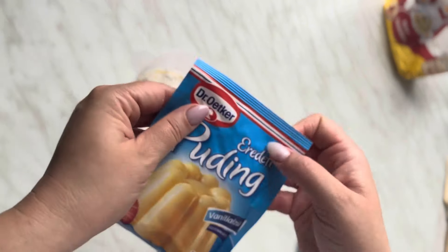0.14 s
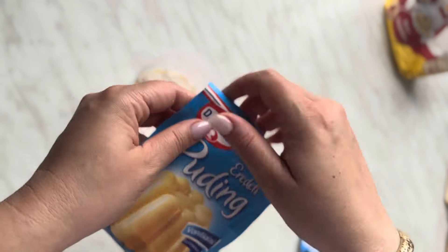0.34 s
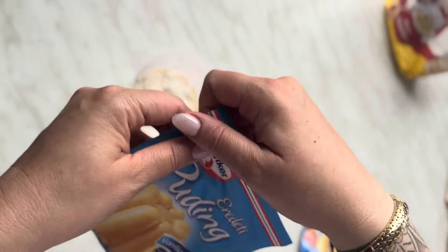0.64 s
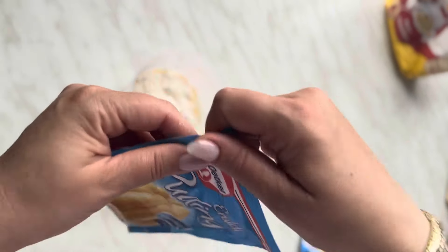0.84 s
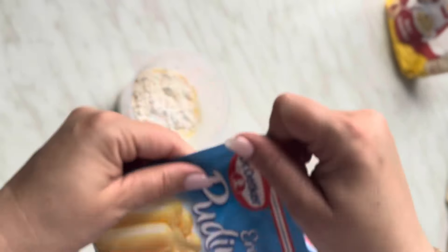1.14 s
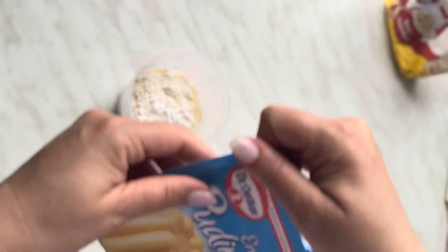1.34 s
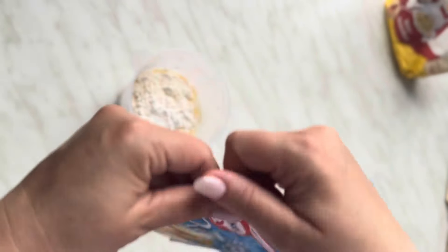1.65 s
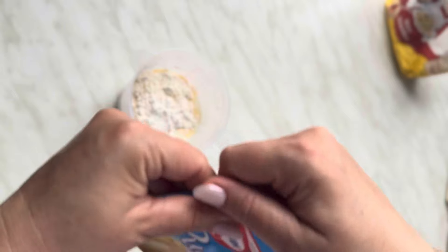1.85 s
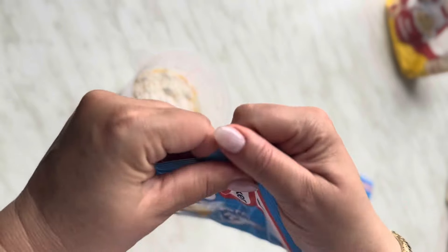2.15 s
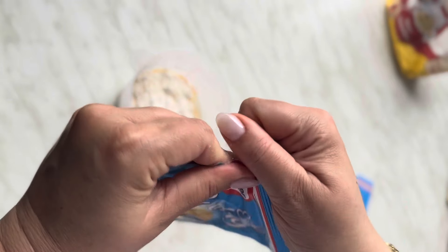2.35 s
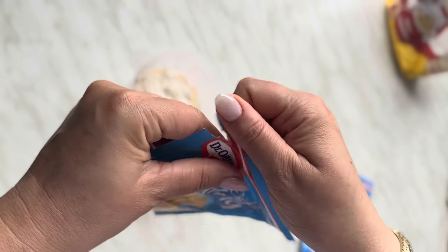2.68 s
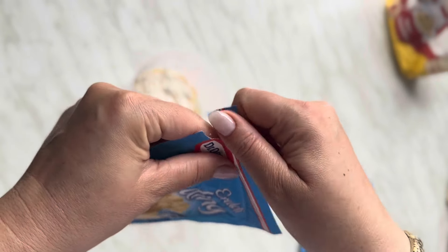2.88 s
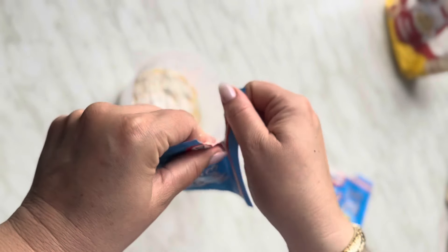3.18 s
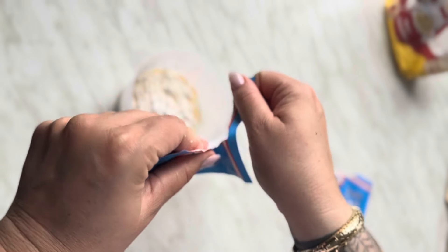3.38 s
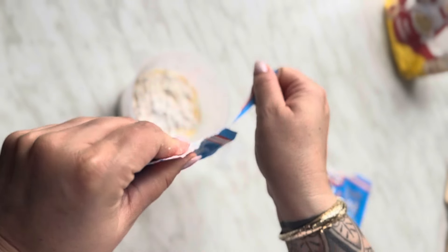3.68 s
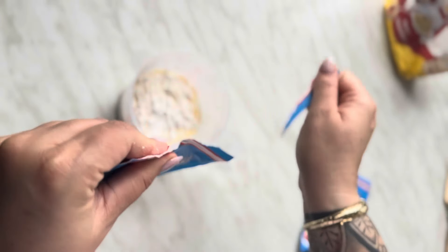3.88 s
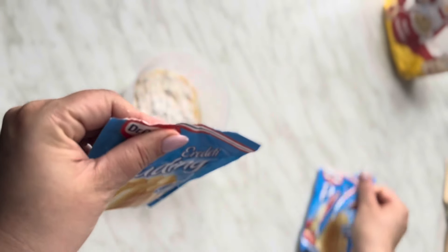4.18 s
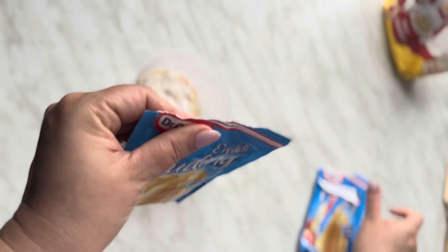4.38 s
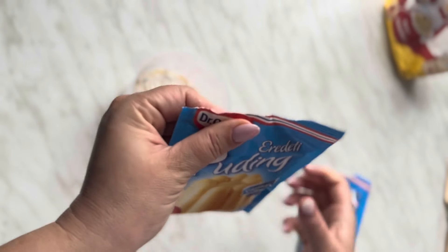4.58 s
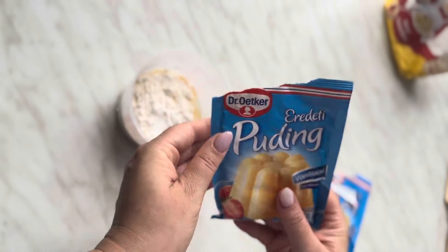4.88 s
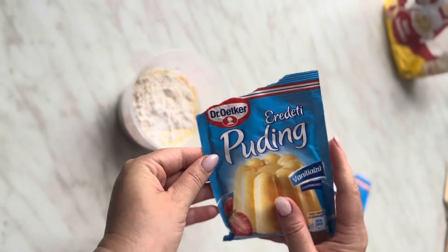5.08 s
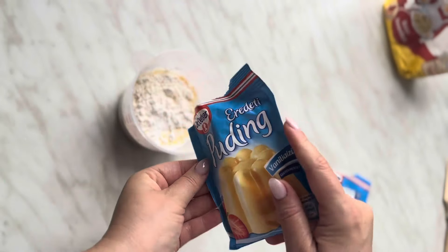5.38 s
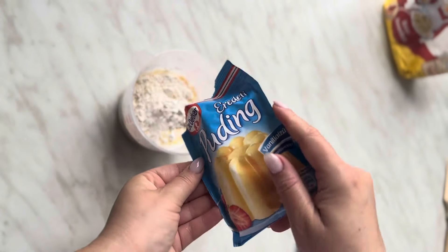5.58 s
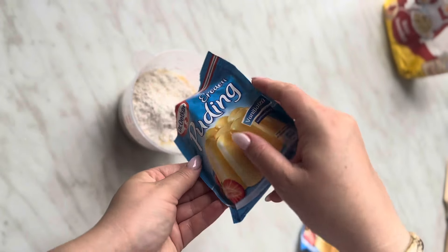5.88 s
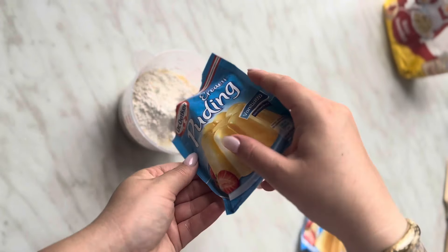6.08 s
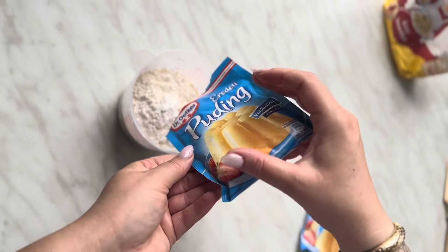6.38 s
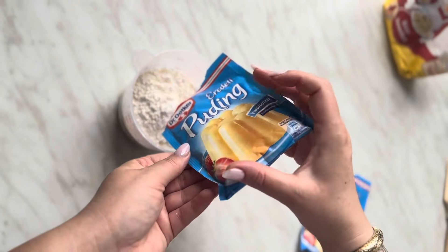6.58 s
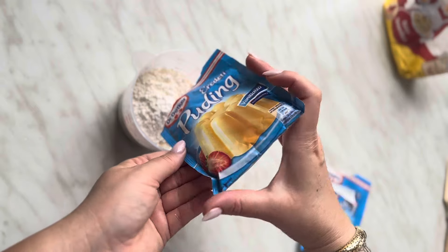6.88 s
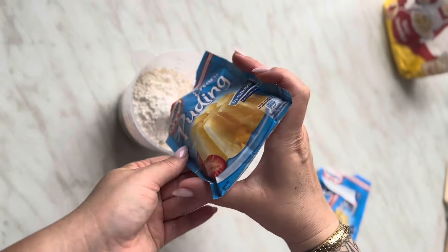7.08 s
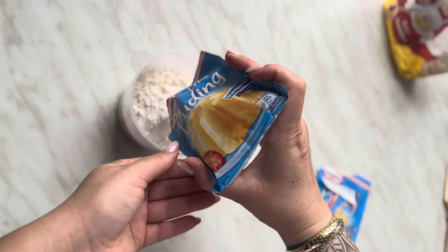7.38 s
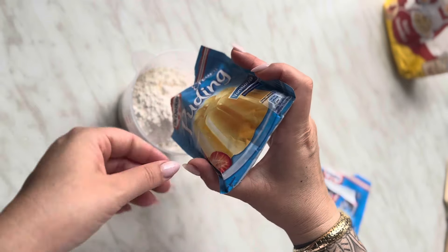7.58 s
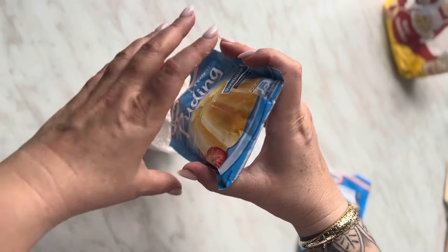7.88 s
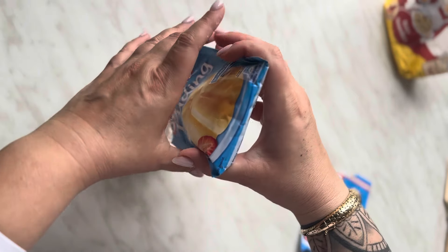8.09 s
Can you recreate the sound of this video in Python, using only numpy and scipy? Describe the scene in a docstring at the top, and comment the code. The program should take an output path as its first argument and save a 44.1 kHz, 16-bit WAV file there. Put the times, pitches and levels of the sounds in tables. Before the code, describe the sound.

Two hands work a stiff, powder-filled paper sachet close to the microphone in a small kitchen. Dense crisp snaps and crinkles come first, with dull pops and a tiny zip, then a gritty tear in uneven spurts. A quiet stretch holds faint ticking creaks before a burst of loud pops as the packet is squeezed, and sparse soft crackles follow over low hum.

```python
"""Tearing open a paper sachet

Two hands grip a coated, powder-filled paper sachet over a kitchen worktop, tear off its top strip and squeeze it open.
The stiff wall buckles in sharp snaps, each a filtered impulse with a noisy flutter, over a fine crinkle of random
impulses; the tear is a dense run of breaking fibres, the seam a short tone burst, the thuds decaying sines.
A creak of regular ticks is heard at times. A small kitchen with a mains hum in still air answers with
echoes of shaped noise, and two closely spaced microphone ports listen from just above."""
import sys
import numpy as np
from scipy import signal
from scipy.fft import rfft, irfft, next_fast_len
from scipy.io import wavfile
from scipy.ndimage import map_coordinates

SR = 44100
rng = np.random.default_rng(int(sys.argv[2]) if len(sys.argv) > 2 else 0)


def digitize_waveform(pressure):
    """Quantize a signal to 16-bit integers and store it at the path in sys.argv[1].

    Rows of a 2-D input are taken as channels; values are limited to [-1, 1].
    """
    field = np.atleast_2d(pressure).T
    bounded = np.clip(field, -1, 1)
    quanta = np.round(bounded * 32767).astype(np.int16)
    wavfile.write(sys.argv[1], SR, quanta)


N = 363384
T = np.arange(N) / SR  # s

# snaps of a crease: start_s, level_db, pitch_hz of the buckling patch, crack_db of the coating re the snap
CREASE_SNAPS = [(0.004, -4.5, 1290, -14.5), (0.091, -4, 1790, -28), (0.14, -10.5, 2440, -2.5),
                (0.3293, -4, 1560, -14.5), (0.352, -8, 1320, -5.5), (0.376, -9, 2660, -10),
                (0.414, -9.5, 1550, -25), (0.489, -10, 1270, -2), (0.505, -15.5, 1900, 1),
                (0.5163, 0.5, 1480, -24), (0.5201, -4, 850, 3.5), (0.541, -4.5, 1400, -6),
                (0.5626, -6.5, 1880, -3), (0.6498, -11.5, 1190, -11), (0.727, -11.5, 2130, -19),
                (0.769, -7.5, 2460, -0.5), (0.9212, -4.5, 1190, -8), (0.9427, -2.5, 2370, -23),
                (0.9493, 2, 1260, -9.5), (0.9556, 0, 2030, -11), (0.9646, -1, 900, -9),
                (1.011, -9, 1400, -8), (1.0216, 2, 486, -6.5), (1.0376, 3, 1980, -7.5),
                (1.051, -10, 3500, -11), (1.07, -22, 1210, 13), (1.0972, -3.5, 1590, -24),
                (1.105, -5.5, 377, -28), (1.128, -6.5, 1120, -9), (1.15, -5.5, 1980, -5),
                (1.1554, 1, 920, -1.5), (1.1656, 5.5, 3800, -8.5), (1.205, -3, 1060, -23),
                (1.248, -6, 377, -35), (1.2782, -12.5, 1250, -30), (1.326, -9, 1010, -5.5),
                (1.3645, -24, 2010, 7), (1.429, -3, 3240, -5), (1.4813, -15, 1000, 2.5),
                (1.6229, -20.5, 1270, 4.5), (1.855, -28.5, 2460, 12), (1.8643, -7, 1920, -2.5),
                (1.8797, -11.5, 3110.0, -10), (1.918, -10, 1400, 3.5), (1.999, -10, 3050, 2),
                (2.034, -18, 4300, -20), (2.0595, 4.5, 1800, -12), (2.1557, -9, 1970, -3.5),
                (2.205, -3, 920, -11), (2.2145, 1, 660, -20), (2.3061, 2, 2230, 2), (2.3075, 10, 408, -31),
                (2.3717, -3.5, 1910, -8), (2.513, -27, 1300, 9.5), (2.5557, -10.5, 990, -14),
                (2.625, -24.5, 2000, 5.5), (2.683, -13, 1500, -10), (2.767, -11, 2000, -9),
                (2.8108, -13, 1390, -10), (2.8947, -9, 1850, -15), (2.907, -14.5, 1780.0, 11),
                (2.99, -11, 1100, 3), (3.142, -0.5, 1620, -3.5), (3.152, -5, 1190, 2),
                (3.403, -10, 2000, -6), (3.5488, -1.5, 2080, -11), (3.5856, -2.5, 2340, -3.5),
                (3.932, -17.5, 2200, -24), (3.958, -14.5, 1390, -19), (4.0171, -15.5, 2070, -5.5),
                (4.0307, -17.5, 2200, -1.5), (4.106, -17, 1600, -20), (4.122, -20, 2300, -4.5),
                (4.2528, -14, 2380, -4), (4.51, -15.5, 3250, -6), (4.522, -19, 3120, -9),
                (4.601, -25, 2940, -25), (4.7556, -14.5, 980, -3), (4.769, -11.5, 2400, -11),
                (4.934, -10, 1560, -33), (5.0414, -9, 1450, -37), (5.064, -13, 2720, -33),
                (5.237, -18, 2200, -36), (5.277, -6.5, 855, -41), (5.3064, 6, 2710, -17),
                (5.316, 2, 1870, -12), (5.3469, 3, 1540, -28), (5.352, 3.5, 1700, -13.5),
                (5.464, -18, 1670, -27), (5.599, 0.5, 1740, -14), (5.61, -23, 2130.0, 12),
                (5.706, -2.5, 1590, -13), (5.768, -1.5, 1850, -31), (5.8193, -1, 1090, -21.5),
                (6.0273, -16, 1250, -18), (6.1836, -6.5, 2070, -40), (6.2229, -9, 2240, -45),
                (6.33, -17, 1480, -14), (6.4548, -1, 1720, -14), (6.477, -8, 850, -33),
                (6.7597, -6, 1400, -25), (6.818, -11.5, 2400, -18), (6.8366, -22, 2200, -21),
                (6.8951, -13.5, 2240, -17), (6.926, -11.5, 1590, -9.5), (6.9687, -19.5, 1480, -27),
                (7.1401, -8.5, 980, -33), (7.242, -11.5, 1310, -36), (7.3353, -7, 1200, -49),
                (7.4451, -6.5, 1500, -15), (7.5304, -17, 1220, -31), (7.7034, -20, 1340, -32),
                (8.066, -13, 1430, -42), (8.1095, -7, 1110, -45), (8.158, 1, 1460, -44),
                (8.1588, 2, 870, -28.5), (8.173, -16, 1580, -35)]
# slackness of the wall, which pushes air and flutters with each snap: time_s, push_db re the snap,
# flutter (amplitude ratio re the first flip)
SLACKNESS = [(.3, 0.5, 0.63), (1.0, -3, 0.66), (1.5, 2, 0.56), (2.3, -12, 0.69), (3.6, -8.5, 0.88),
             (4.8, 4, 0.47), (5.33, -15.5, 0.31), (5.8, -6, 0.83), (6.6, -3, 0.7), (8.201, -2, 0.78)]


def amp(db):
    """Level: a ratio in decibels becomes an amplitude gain."""
    return 10 ** (np.asarray(db) / 20)


def evened(x):
    """Mean power: scales a signal to rms 1."""
    return x / np.sqrt(np.mean(x ** 2) + 1e-20)


def read(points, hz):
    """Logarithmic pitch scale: interpolates a table along log frequency."""
    f, value = np.transpose(points)
    return np.interp(np.log(hz + 1), np.log(f + 1), value)


def add(mix, s, sound):
    """Superposition: adds a sound into the mix, in place, from a time in seconds."""
    part = mix[max(round(s * SR), 0):][:len(sound)]
    part += sound[:len(part)]


def click(gain):
    """Minimum phase: the causal impulse response that has this magnitude spectrum."""
    log_gain = np.log(np.maximum(np.r_[gain, gain[-2:0:-1]], 1e-5))
    return np.fft.ifft(np.exp(np.conj(signal.hilbert(log_gain)))).real


def coloured(x, spectrum, size=2048):
    """Linear filtering: convolution with a causal response imposes a spectral colour."""
    hz = np.fft.rfftfreq(size, 1 / SR)
    return signal.oaconvolve(x, click(amp(read(spectrum, hz))))[:N]


def bell(hz, centre_hz, q):
    """Resonance curve: magnitude peaks at the centre and narrows with q."""
    return 1 / (1 + (q * (hz / centre_hz - centre_hz / (hz + 1))) ** 2)


def resonate(x, hz, width_hz):
    """Time-varying resonance: a one-pole filter, shifted to a moving frequency, with gain 1 at its peak."""
    turn = np.exp(2j * np.pi * np.cumsum(hz) / SR)
    r = np.exp(-np.pi * width_hz / SR)
    return 2 * (turn * signal.lfilter([1 - r], [1, -r], x / turn + 1e-18)).real


def grains(per_s, spread_db, clump_db, clump_s):
    """Random impulse process: tiny fractures of uneven size whose strength swells in clumps; rms 1."""
    size = amp(spread_db * np.minimum(rng.exponential(1, N), 4)) * rng.choice([-1, 1], N)
    clumps = np.interp(T / clump_s, np.arange(N), np.clip(rng.standard_normal(N), -2, 2))
    struck = rng.random(N) < per_s / SR
    return evened(size * amp(clump_db * clumps) * struck)


def crackles(per_s, spread_db, count=14, size=512):
    """Impulsive excitation of resonators: tiny creases of many pitches, broadband in sum; rms 1."""
    hz, out = np.fft.rfftfreq(size, 1 / SR), np.zeros(N)
    for pitch_hz in np.geomspace(200, 9000, count):
        strength = amp(spread_db * np.minimum(rng.exponential(1, N), 3)) * rng.choice([-1, 1], N)
        hits = strength * (rng.random(N) < per_s / count / SR)
        out += signal.oaconvolve(hits, click(bell(hz, pitch_hz, 2.03)))[:N]
    return evened(out)


def patchy(x, depth_db, patch_s=0.016, patch_hz=450, size=512):
    """Modal variation: as the sheet changes shape its resonances swell and fade in time-frequency patches."""
    hz, t, z = signal.stft(x, SR, nperseg=size)
    where = np.meshgrid(hz / patch_hz, t / patch_s, indexing="ij")
    field = map_coordinates(rng.standard_normal(z.shape), where, order=1)
    return signal.istft(z * amp(depth_db * field), SR, nperseg=size)[1][:N]


def apart(pair, alike_hz, least_alike=0):
    """Spatial coherence: mixes two unrelated signals into a diffuse field, alike in the bass, less so above."""
    hz = np.fft.rfftfreq(pair.shape[1], 1 / SR)
    same = np.clip(1 / (1 + (hz / alike_hz) ** 2), least_alike, 1)
    mid, side = rfft(pair) * np.sqrt([1 + same, 1 - same]) / np.sqrt(2)
    return irfft([mid + side, mid - side], pair.shape[1])


def background(waver=0.33, air_db=-58.5):
    """Narrowband modulation and filtered noise: a wavering mains hum in still air."""
    # still air of the kitchen: frequency_hz, density_db (relative, per Hz)
    air_colour = [(20, -3.5), (45, -11), (90, 5.5), (160, 1), (220, -10), (300, -3), (700, -15),
                  (2200, -25.5), (6000, -28.5), (8500, -60), (11000, -79.5), (16000, -35)]
    # mains hum: frequency_hz, level_db (rms)
    hum_tones = [(48.8, -55), (80, -61), (100, -65), (148.5, -66.5)]
    air = apart(np.array([coloured(n, air_colour) for n in rng.standard_normal((2, N))]), alike_hz=670)
    hum = np.zeros(N)
    for hz, db in hum_tones:
        # nine random complex points a second vary both amplitude and phase
        drift = np.interp(T * 9, np.arange(200), rng.standard_normal(200) + 1j * rng.standard_normal(200))
        carrier = np.exp(2j * np.pi * (hz * T + rng.random()))
        hum += amp(db) * evened(((1 + waver * drift) * carrier).real)
    return hum + amp(air_db) * evened(air)


def echoes(near_db=-7, near_s=0.0021, tail_db=-10, dull_hz=12000, size=256):
    """Reflection and reverberation: early echoes off hands and worktop, then a tail, for one hand position."""
    # the kitchen's decay: frequency_hz, t60_s
    decay = [(200, 0.23), (700, 0.2), (2000, 0.15), (5000, 0.25), (9000, 0.08), (15000, 0.093)]
    t = np.arange(SR // 3) / SR
    near = rng.standard_normal((2, len(t))) * (rng.random((2, len(t))) < 2500 / SR)
    near = near * np.exp(-t / near_s) * (t > .0015)
    hz, at, z = signal.stft(rng.standard_normal((2, len(t))), SR, nperseg=size)
    z = z * np.exp(-np.log(1000) * at / read(decay, hz)[:, None])
    tail = signal.istft(z, SR, nperseg=size)[1][:, :len(t)]
    tail *= np.clip(t / 0.0035 - 1, 0, 1)  # the tail fades in from 3.5 to 7 ms
    both = amp(near_db) * evened(near) + amp(tail_db) * evened(tail)
    both = apart(both, alike_hz=397, least_alike=0.42) / np.sqrt(len(t))
    return signal.sosfilt(signal.butter(2, dull_hz, fs=SR, output="sos"), both)  # skin and walls soak up the top


def kitchen(x, shift_s=.13, count=5):
    """Room response: direct sound at both ports plus echoes that crossfade in a cycle as the hands move."""
    out = np.array([x, x])
    for k in range(count):
        distance = abs((T / shift_s - k) % count - count / 2)
        share = x * np.sqrt(np.maximum(1 - distance, 0))
        out += signal.oaconvolve(share[None], echoes(), axes=1)[:, :N]
    return out


def bumps():
    """Damped oscillation: the powder-filled sachet thuds as it jerks or a finger lands."""
    # thuds: start_s, level_db, pitch_hz, decay_s (time constant)
    thuds = [(0.951, -46, 74, 0.051), (1.021, -50, 101, .059), (2.311, -36, 215, .005),
             (3.645, -44, 262, 0.015), (3.677, -41.5, 174, 0.017), (7.336, -44.5, 151.5, 0.077)]
    out, t = np.zeros(N), np.arange(SR // 5) / SR
    for s, db, hz, decay_s in thuds:
        add(out, s, amp(db) * np.sin(2 * np.pi * hz * t) * np.exp(-t / decay_s))
    return out


def creak(level_db=1.5):
    """Stick-slip friction: as the held wall relaxes under the thumb it slips in short, regular runs of ticks."""
    # runs of slips: start_s, length_s, rate_per_s, level_db (before level_db of the creak)
    runs = [(4.21, .056, 205, -20), (4.317, .014, 80, -16), (4.336, .016, 145, -18), (4.361, .022, 48, -16),
            (4.4075, .036, 59, -13), (4.455, .03, 105, -16)]
    # colour of one slip: frequency_hz, gain_db
    slip_colour = [(600, -18.5), (1500, -10), (1850, -15.5), (2200, -4.5), (3000, -17), (4000, -10),
                   (7000, -20), (11000, -32)]
    slips = np.zeros(N)
    for start, length, per_s, db in runs:
        for s in start + np.arange(0, length, 1 / per_s):
            add(slips, s, amp(db + level_db + rng.standard_normal(1)))
    return coloured(slips, slip_colour)


def seam():
    """Periodic release: the ribs of the sealed edge part in one very fast zip, a tone burst under an arch."""
    # the zip: start_s, peak_db, pitch_hz, length_s
    s, db, hz, length = (2.3062, -5.2, 11250, .001)
    out, t = np.zeros(N), np.arange(0, length, 1 / SR)
    arch = np.sqrt(np.sin(np.pi * t / length))
    add(out, s, amp(db) * arch * np.sin(2 * np.pi * hz * t))
    return out


def tear(level_db=2, strip_db=-2):
    """Brittle fracture: fibres break in quick spurts and set the lengthening torn strip resonating."""
    # pull on the strip: time_s, pull_db (before level_db)
    pull = [(2.9, -67), (2.913, -42.5), (3.07, -45.5), (3.17, -40), (3.23, -38), (3.3, -47.5),
            (3.42, -38.5), (3.62, -42.5), (3.679, -36.5), (3.694, -63)]
    # colour of the breaking fibres: frequency_hz, density_db (relative, per Hz)
    fibre_colour = [(60, -20), (220, 1.5), (650, -7), (1000, 2.5), (1450, -7), (2550, 1.5), (4200, -2.5),
                    (6000, -.5), (9000, 2), (12000, -7), (15000, 6.5)]
    # ring of the freed strip, lower as it grows: start_hz, end_hz
    strip_hz = (3300, 2320)
    s, pull_db = np.transpose(pull)
    breaks = grains(per_s=5000, spread_db=2.6, clump_db=4.5, clump_s=.004)
    breaks = breaks + .7 * crackles(per_s=1300, spread_db=3.2)
    rip = patchy(coloured(breaks, fibre_colour), depth_db=4)
    rip = rip + amp(strip_db) * resonate(rip, np.interp(T, s[[0, -1]], strip_hz), width_hz=250)
    return evened(rip) * amp(np.interp(T, s, pull_db, left=-np.inf, right=-np.inf) + level_db)


def handling(grip_rub_db=-0.5, settle_flex_db=-63.5, settle_rub_db=-63.5, settle_s=0.028,
             stroke_peak=0.21, stroke_power=0.48):
    """Addition of powers: flexing and rubbing sum a held grip, arched strokes and settling after snaps."""
    # faint rustle of the holding hand: time_s, grip_db (relative)
    grip_levels = [(.27, -95), (.5, -63), (1.3, -58), (1.7, -71.5), (2.25, -57.5), (3.75, -70),
                   (3.9, -69.5), (4.6, -72.5), (5.45, -70.5), (7.1, -64), (7.3, -77.5), (7.66, -82.5),
                   (8.05, -64)]
    # shifts of the fingers that bend the sachet: start_s, length_s, flex_db, rub_db (both relative)
    strokes = [(0.0, 0.15, -59, -53.5), (0.139, 0.097, -66, -55), (0.277, 0.19, -55.5, -51.5),
               (0.447, 0.12, -58, -45.5), (0.573, 0.073, -53, -53.5), (0.698, 0.71, -68, -52.5),
               (0.885, 0.097, -50.5, -47.5), (1.011, 0.046, -45, -46), (1.204, 0.08, -50.5, -51),
               (1.302, 0.14, -58, -53.5), (1.421, 0.12, -51.5, -43.5), (1.527, 0.1, -76, -57.5),
               (1.711, 0.049, -60.5, -48.5), (1.75, 0.77, -72, -54.5), (2.175, 0.039, -44.5, -43),
               (2.303, 0.082, -47, -44), (2.437, 0.034, -56, -50), (2.64, 0.081, -49, -47.5),
               (2.751, 0.053, -52.5, -49), (2.917, 0.9, -59, -51), (3.152, 0.073, -46.5, -60),
               (4.037, 0.094, -56.5, -62), (4.69, 0.12, -58, -55), (4.749, 0.035, -45.5, -48.5),
               (4.886, 0.17, -63, -60.5), (5.029, 0.058, -52.5, -49.5), (5.38, 0.2, -62.5, -61),
               (5.636, 0.4, -60, -65), (6.064, 0.061, -58, -52), (6.296, 0.074, -52.5, -56),
               (6.449, 0.19, -55, -54.5), (6.805, 0.053, -54.5, -53.5), (6.888, 0.051, -57, -52),
               (7.027, 0.23, -76, -64.5), (7.373, 0.23, -64, -63.5), (7.78, 0.2, -75.5, -62),
               (8.167, 0.26, -55, -63)]
    grip = amp(np.interp(T, *np.transpose(grip_levels)))
    flex, rub = grip ** 2, (grip * amp(grip_rub_db)) ** 2
    for start, length, flex_db, rub_db in strokes:
        # the arch peaks at stroke_peak, a share of its length
        progress = np.arange(0, length, 1 / SR) / length
        phase = np.interp(progress, [0, stroke_peak, 1], [0, .5, 1])
        arch = abs(np.sin(np.pi * phase)) ** stroke_power
        add(flex, start, (amp(flex_db) * arch) ** 2)
        add(rub, start, (amp(rub_db) * arch) ** 2)
    settling = np.exp(-np.arange(SR // 4) / SR / settle_s)
    when, _, flutter = np.transpose(SLACKNESS)
    for s, db, _, _ in CREASE_SNAPS:
        loose = np.interp(s, when, flutter) * settling  # a slacker wall settles more
        add(flex, s, (amp(db + settle_flex_db) * loose) ** 2)
        add(rub, s, (amp(db + settle_rub_db) * loose) ** 2)
    return np.sqrt(flex), np.sqrt(rub)


def crinkle(flex_gain_db=-1, rub_gain_db=-2):
    """Crackling noise and friction: small creases give as the wall bends, and skin scrapes over the coating."""
    # colour of the flexing wall: frequency_hz, density_db (relative, per Hz)
    flex_colour = [(50, -15), (250, 5.5), (650, 2.5), (1000, 0.5), (2500, 5), (4500, -8), (9000, -25)]
    # colour of skin on the coating: frequency_hz, density_db (relative, per Hz)
    rub_colour = [(1200, -8.5), (2500, 8.5), (4000, 7), (6500, 7.5), (9000, 4), (12000, -16), (16000, 7)]
    flexing, rubbing = handling()
    creases = crackles(per_s=480, spread_db=3.5)
    scrape = grains(per_s=7000, spread_db=2.4, clump_db=2, clump_s=.008)
    flex = evened(coloured(creases + 0.85 * scrape, flex_colour)) * flexing * amp(flex_gain_db)
    rub = evened(coloured(scrape + 0.4 * creases, rub_colour)) * rubbing * amp(rub_gain_db)
    return patchy(flex + rub, depth_db=3)


def cascade(delay_s=.022, weaker_db=-8, scatter=.35, lowest_hz=1200, count=2):
    """Triggered instability: each snap sets off smaller ones in nearby creases, stronger in a slacker wall."""
    when, _, flutter = np.transpose(SLACKNESS)
    rows = list(CREASE_SNAPS)
    all_draws = rng.standard_normal((len(CREASE_SNAPS), count, 2))
    for (s, db, pitch_hz, crack_db), draws in zip(CREASE_SNAPS, all_draws):
        follower_db = db + weaker_db + 20 * np.log10(np.interp(s, when, flutter) ** 2)
        for wait, shift in draws:
            follower_hz = max(pitch_hz, lowest_hz) * np.exp(scatter * shift)
            rows.append((s + delay_s * abs(wait), follower_db, follower_hz, crack_db))
    return rows


def snaps(body_db=-1.5, q=0.66, crack_hz=6500, crack_q=0.66, push_hz=400, push_q=1.0,
          flutter_cycles=4.35, give_cycles=2.4, ring_db=0, ring_q=11, mode_step=1.6,
          wall_top_hz=6200, top_hz=13000, size=2048):
    """Snap-through buckling: a patch starts to give, flips with knock, modes, crack and air push, then flutters."""
    out, hz = np.zeros(N), np.fft.rfftfreq(size, 1 / SR)
    lead = size // 10  # samples before the flip
    t = (np.arange(size // 2) - lead) / SR
    softness = 1 / np.sqrt(1 + (hz / top_hz) ** 4)
    paper = 1 / np.sqrt(1 + (hz / wall_top_hz) ** 6)
    when, push, flutter = np.transpose(SLACKNESS)
    rows = cascade()
    for (s, db, pitch_hz, crack_db), noise in zip(rows, rng.standard_normal((len(rows), len(t)))):
        outer = bell(hz, pitch_hz / mode_step, ring_q) + bell(hz, pitch_hz * mode_step, ring_q)
        modes = bell(hz, pitch_hz, ring_q) + .5 * outer
        knock = paper * amp(body_db) * bell(hz, pitch_hz, q)
        crack = amp(crack_db) * bell(hz, crack_hz, crack_q)
        air_push = amp(np.interp(s, when, push)) * bell(hz, push_hz, push_q)
        parts = [knock, paper * amp(ring_db) * modes, crack, air_push]
        # noise grows while the patch gives and dies away as it flutters; the flip is a unit impulse
        shiver = noise * np.exp(np.minimum(t * pitch_hz / give_cycles, -t * pitch_hz / flutter_cycles))
        shiver *= np.interp(s, when, flutter) / np.linalg.norm(shiver)
        shiver[lead] = 1
        ring = click(softness * np.linalg.norm(parts, axis=0))  # the parts add in power
        snap = signal.fftconvolve(ring, shiver)
        # the flutter leaves the energy of the snap unchanged
        add(out, s + t[0], amp(db) * snap * np.linalg.norm(ring) / np.linalg.norm(snap))
    return out


def bending(x, crossing_s=.0007, crossing_hz=4000):
    """Bending-wave dispersion: speed grows with the root of frequency, so a click becomes a falling chirp."""
    size = next_fast_len(N + SR)
    hz = np.fft.rfftfreq(size, 1 / SR)
    # waves cross the sheet in crossing_s at crossing_hz; that delay is taken off at all frequencies
    turns = crossing_s * (2 * np.sqrt(crossing_hz * hz) - hz)
    return irfft(rfft(x, size) * np.exp(-2j * np.pi * turns), size)[:N]


def wall(x, ring_db=-16.5):
    """Modal resonance: whatever shakes the stretched sachet also sets its damped modes ringing."""
    # modes: frequency_hz, level_db (relative), t60_s
    wall_modes = [(297, -5.5, 0.0092), (974.4, -6, 0.055), (1522, -9.5, 0.01), (2730, -33, 0.2),
                  (1970, -21.5, 0.25)]
    t, modes = np.arange(SR // 8) / SR, 0
    for hz, db, t60 in wall_modes:
        mode = np.sin(2 * np.pi * hz * t) * np.exp(-np.log(1000) * t / t60)
        modes = modes + amp(db) * evened(mode)
    return x + amp(ring_db) * signal.oaconvolve(x, modes / np.sqrt(len(t)))[:N]


def scene(seam_room=0.64):
    """Superposition and directivity: the sachet in its kitchen; the beamed zip excites the echoes less."""
    rip = seam()
    sachet = wall(bending(snaps() + crinkle() + tear() + creak())) + bumps()
    return kitchen(sachet + seam_room * rip) + (1 - seam_room) * rip + background()


def record(dry, right_db=0.33, edge_hz=16050):
    """Phase lag between ports: the right one answers later and louder; then the recorder's band limit."""
    # lag of the right port behind the left: frequency_hz, lag_rad
    port_lag = [(100, 0), (780, .3), (1500, .1), (4200, .5), (5000, 2.4), (5700, 5.8), (9400, 3.7),
                (15400, 2.2)]
    lag = read(port_lag, np.fft.rfftfreq(N, 1 / SR))
    right = amp(right_db) * irfft(rfft(dry[1]) * np.exp(-1j * lag), N)
    lowpass = signal.firwin(255, edge_hz, window=("kaiser", 9), fs=SR)
    return signal.oaconvolve(np.array([dry[0], right]), lowpass[None], "same", axes=1)


dry = scene()
out = record(dry)
digitize_waveform(out)
```